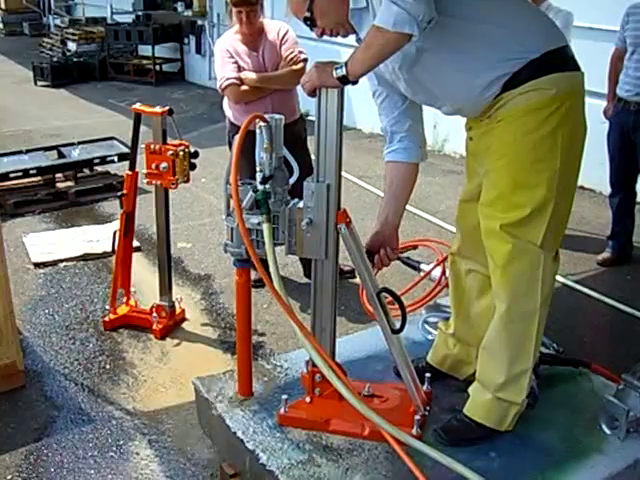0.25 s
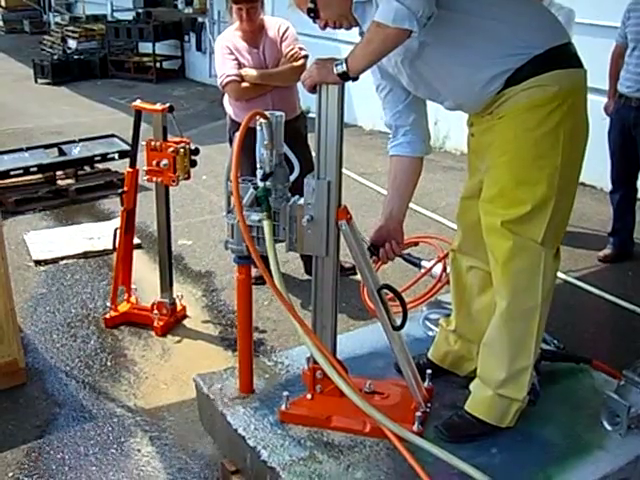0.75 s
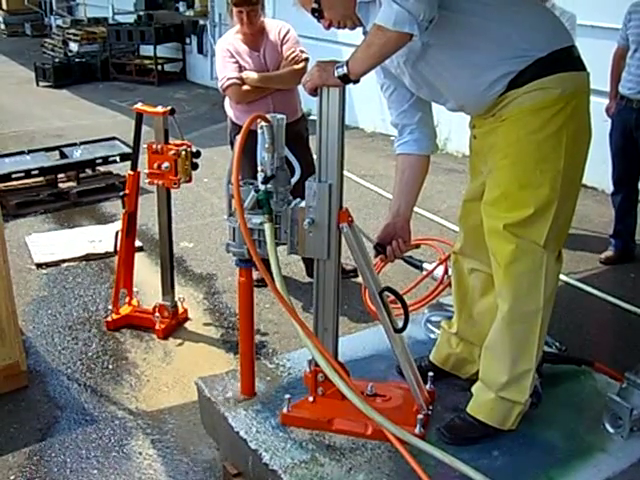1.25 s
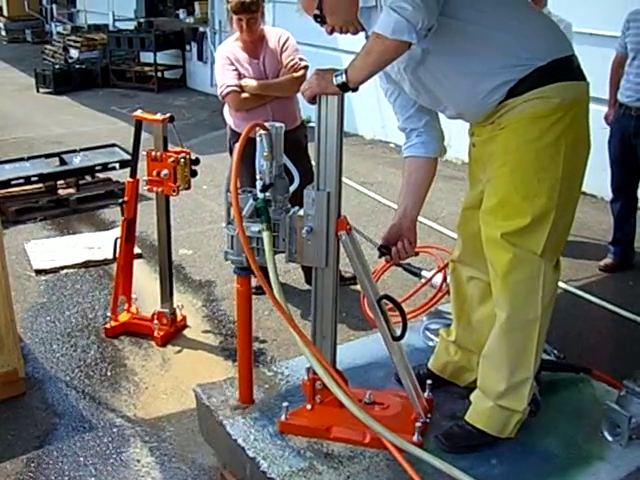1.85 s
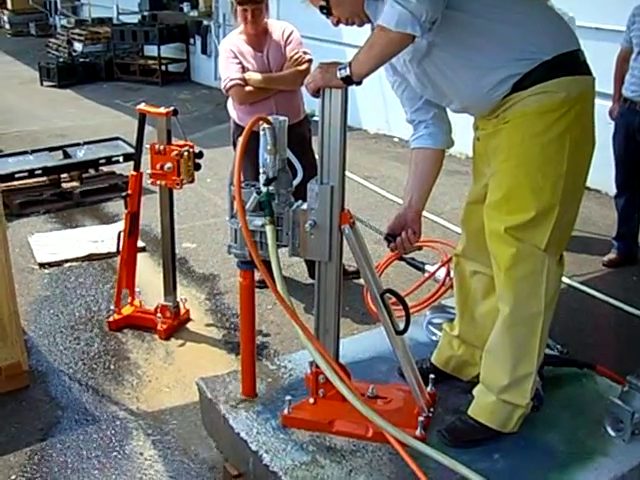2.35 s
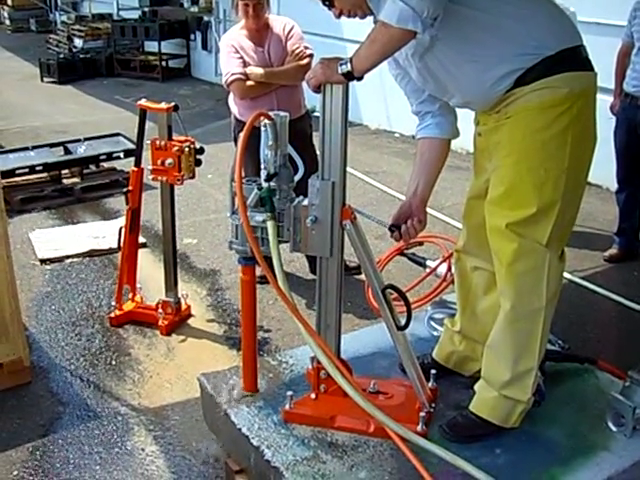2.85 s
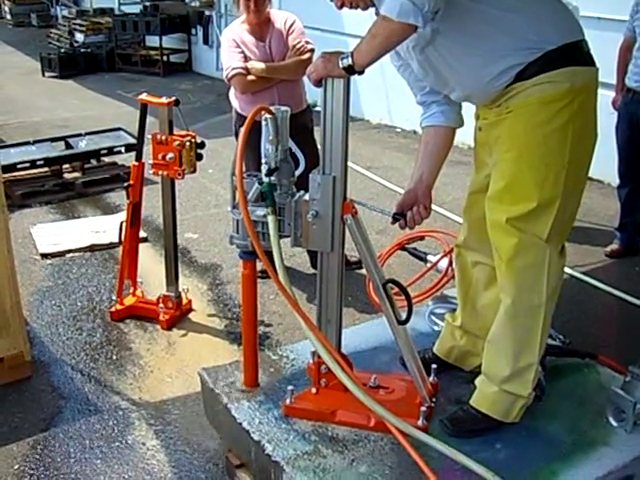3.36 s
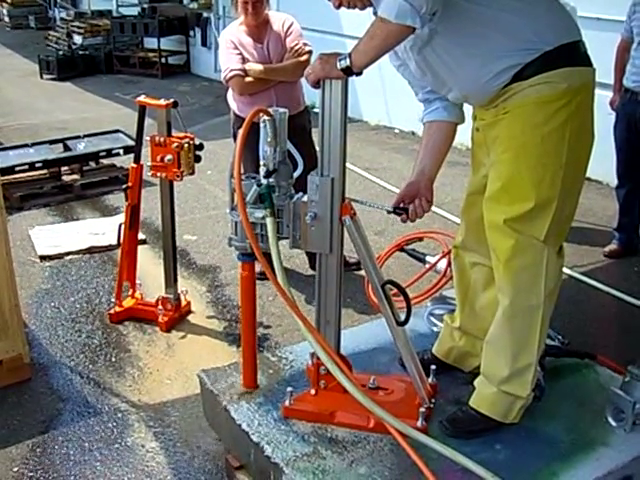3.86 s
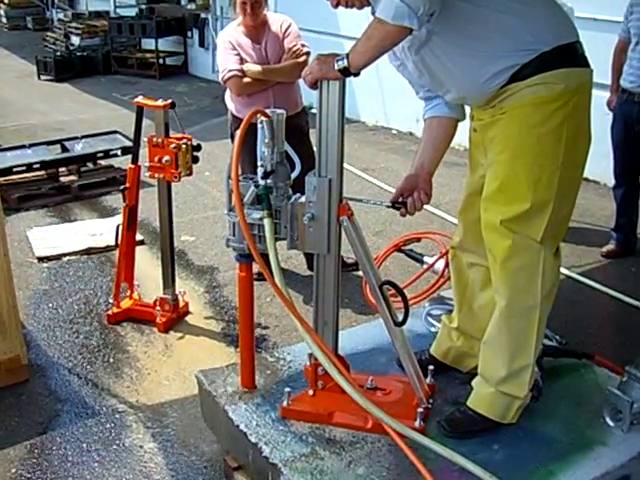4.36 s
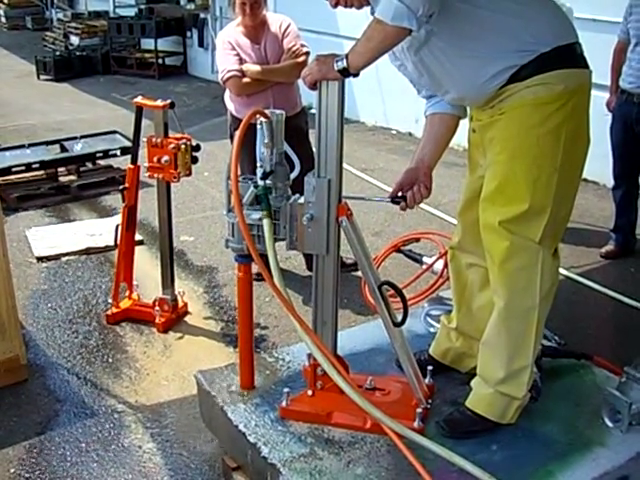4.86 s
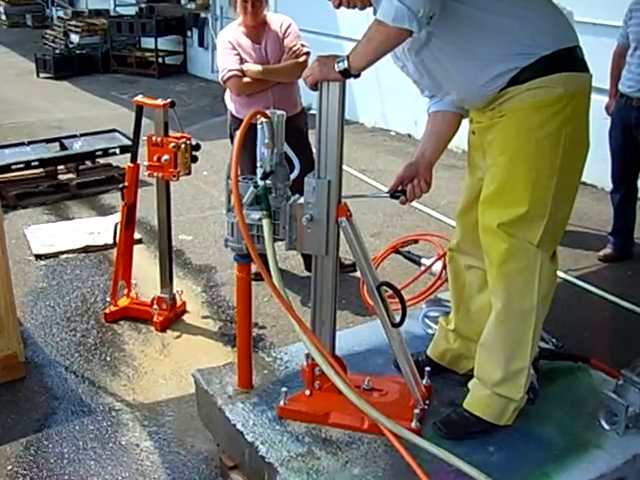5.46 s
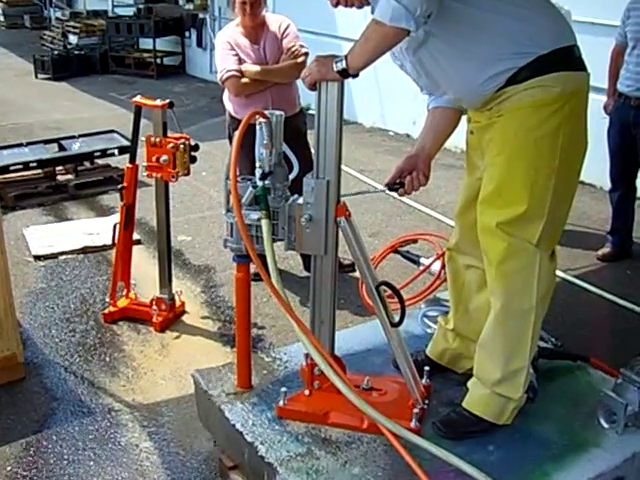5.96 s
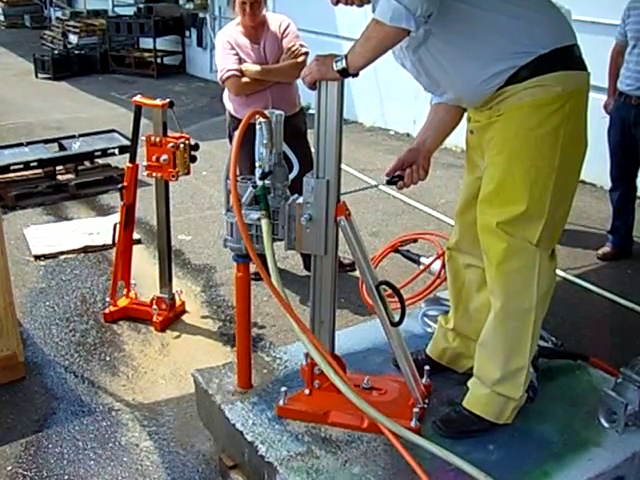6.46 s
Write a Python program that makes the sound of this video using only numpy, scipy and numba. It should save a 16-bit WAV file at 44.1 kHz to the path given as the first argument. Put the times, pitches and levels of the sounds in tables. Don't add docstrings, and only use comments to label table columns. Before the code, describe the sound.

Continuous shrill gear whine of an electric drill boring concrete, with throbbing barrel hum, gritty scraping and hissing water spray, in open air.

```python
import sys
import numpy as np
from scipy import signal
from scipy.fft import rfft, irfft
from scipy.io import wavfile
from scipy.ndimage import uniform_filter1d
from numba import njit

SR = 44100
rng = np.random.default_rng(int(sys.argv[2]) if len(sys.argv) > 2 else 0)


def file_out(sig):
    cols = np.atleast_2d(sig).T
    lim = np.clip(cols, -1, 1)
    pcm = np.round(lim * 32767).astype(np.int16)
    wavfile.write(sys.argv[1], SR, pcm)


def gain_from_decibels(decibels):
    exponent = np.asarray(decibels, float) / 20
    return 10 ** exponent


N = 295470
BLOCK = 64
TIME = np.arange(N // BLOCK + 2) * BLOCK / SR

PINION_TEETH, WHEEL_TEETH = 9, 38
SPINDLE_RATIO = 28.467
BEARING_RATIO = 1.28355

# time in seconds, pinion mesh in Hz, whine level in dB.
MOTOR_SPEED = [(0, 4446, -18.5), (.33, 4444, -18.1), (.62, 4451, -19.8), (.95, 4449.8, -20.7),
               (1.8, 4443, -18.7), (2.0, 4445.2, -18.7), (2.38, 4444, -18.7), (2.56, 4448.8, -19.5),
               (3.15, 4443.4, -18.6), (3.4, 4444.4, -20.6), (3.85, 4444, -21.3), (4.35, 4447.3, -22.8),
               (4.85, 4447.6, -23.6), (5.1, 4451, -26.3), (5.42, 4451, -27.2), (5.68, 4446.4, -23.9),
               (6.25, 4446.3, -22.2), (6.7, 4447.3, -24.5)]


def motor_turns():
    mesh_hz = curves(MOTOR_SPEED)[0]
    mesh_cycles = (np.cumsum(mesh_hz) - MOTOR_SPEED[0][1]) * BLOCK / SR
    return mesh_cycles / PINION_TEETH


# level in dB, dB gained per dB of whine.
WHINE_COMPANIONS = [
    (-33.5, 0),
    (-37.1, 2),
    (-42, -.9),
]


def whine(motor):
    whine_db = curves(MOTOR_SPEED)[1]
    strain_db = whine_db - whine_db.mean()
    tenth_db, slip_db, octave_db = (db + follow * strain_db for db, follow in WHINE_COMPANIONS)
    flutter_hz = 4 * walk(5)
    slip = 9.905 * motor + np.cumsum(flutter_hz) * BLOCK / SR
    pinion = tone(PINION_TEETH * motor, whine_db + 0.2 + 0.47 * walk(18))
    sides = [(PINION_TEETH + 1, tenth_db), (2 * PINION_TEETH, octave_db)]
    return pinion + tones(motor, sides, wobble_db=2.5, rate=14) + tone(slip, slip_db)


# multiple of motor turn, level in dB.
MOTOR_ORDERS = [(10, -34.1), (12, -43.0), (13, -47.4), (15, -46.0), (17, -44.7), (18, -38.8), (19, -43.7),
                (21, -45.8), (23, -52.6), (24, -53.6), (27, -55.2), (28, -63.2), (29, -63.5), (30, -55.1)]
# multiple of countershaft turn, level in dB.
COUNTERSHAFT_ORDERS = [(19, -45.6), (20, -47.4), (24, -42.7), (37, -43.5), (39, -39.1), (40, -44.0),
                       (41, -40.2), (48, -42.2), (57, -43.0), (58, -48.8), (69, -53.9), (70, -51.0),
                       (84, -46.8), (90, -48.5), (95, -49.4), (96, -53.1), (99, -50.1), (105, -56.7),
                       (125, -63.6), (126, -65.5)]


def shafts(motor):
    in_whine = (PINION_TEETH + 1, 2 * PINION_TEETH)
    motor_orders = [row for row in MOTOR_ORDERS if row[0] not in in_whine]
    countershaft = motor * PINION_TEETH / WHEEL_TEETH
    hum = tones(motor, motor_orders, wobble_db=2.5)
    return hum + tones(countershaft, COUNTERSHAFT_ORDERS, wobble_db=3.0, rate=7)


# multiple of ball pass, spindle sideband, level in dB.
BALL_PASSES = [(1, 0, -37), (1, 1, -44), (1, 2, -44), (1, 3, -46), (2, 0, -34), (3, 0, -47), (4, 0, -48),
               (5, 0, -50)]


def bearing(motor):
    balls = [(k * BEARING_RATIO + side / SPINDLE_RATIO, db) for k, side, db in BALL_PASSES]
    return tones(motor, balls, wobble_db=1.5)


# multiple of motor turn, level in dB.
HOUSING_BEATS = [(1.735, -54), (2.311, -45), (2.372, -43), (2.6187, -45), (2.721, -49), (2.7504, -43),
                 (5.501, -48), (5.5926, -45), (5.775, -45), (8.435, -46), (8.618, -40.5), (8.909, -45),
                 (8.965, -45), (10.09, -48), (22.04, -47)]
# multiple of spindle turn, level in dB.
SPINDLE_MESH = [(31, -41.5), (61, -43), (62, -31), (93, -39.5), (124, -47), (186, -45), (217, -47)]


def gearbox(motor, spindle):
    beats = tones(motor, HOUSING_BEATS, wobble_db=2.5, rate=9)
    mesh = tones(spindle, SPINDLE_MESH, wobble_db=0.24)
    return gain_from_decibels(-0.5) * shafts(motor) + gain_from_decibels(0.2) * (bearing(motor) + beats + mesh)


# multiple of spindle turn, level in dB.
LOW_RING = [(37, -49), (38, -34), (39, -35.5), (40, -48)]
# multiple of spindle turn, level in dB.
HIGH_RING = [(76, -37), (77, -33), (78, -48), (79, -48)]
RING_PARTNER = [(75, -35.5)], -.0218


def barrel(spindle):
    low_table = [(k, db - 2.5 + swell(39 if k > 38 else 38)) for k, db in LOW_RING]
    low = ring(spindle, low_table, turn=0.33, wobble_db=1.9)
    high = ring(spindle, HIGH_RING, turn=-0.02, wobble_db=1.8)
    high += ring(spindle, *RING_PARTNER, wobble_db=0.0)
    return low + fine(gain_from_decibels(-0.4 + 0.8 * pressure())) * high


STAND_ORDERS = (9, 10, 11), (15, 17, 20, 22)
# multiple of spindle turn, level in dB.
STAND_SHAKE = [(16, -50), (18, -50), (19, -50), (25, -53), (32, -51), (45, -54), (53, -50), (55, -50),
               (60, -48)]


def stand(spindle):
    sway_orders, stand_orders = STAND_ORDERS
    strong = [(k, -56 + swell(10)) for k in sway_orders]
    strong += [(k, -55.5 + swell(k)) for k in stand_orders]
    weak = gain_from_decibels(-2.0) * tones(spindle, STAND_SHAKE, wobble_db=-1.0, rate=2.4)
    return weak + tones(spindle, strong, wobble_db=3.0, rate=7)


# centre in seconds, multiple of spindle turn, length in seconds, swell in dB.
SHUDDERS = [(0.84, 10, 1.1, 5.5), (2.3, 10, 0.66, 2), (4.1, 10, .4, 5), (5.32, 10, .7, 11),
            (0.54, 15, .9, 9), (1.48, 15, .4, 10), (3.46, 15, 1.0, 5), (6.1, 15, 1.3, 12), (1.0, 17, 1, 14),
            (2.65, 17, .6, 5), (4.8, 17, 0.7, 14.5), (0.72, 20, .5, 10), (1.74, 20, .5, 14),
            (2.32, 20, 0.64, 18.5), (6.6, 20, .6, 8), (0.65, 22, 2.6, 9.5), (2.83, 22, 0.73, 10.5),
            (4.03, 22, 1.4, 10.5), (6.6, 22, .5, 8), (1.2, 38, 0.44, 4), (2.3, 38, 0.59, 5.5),
            (3, 38, 0.45, 6.5), (4.46, 38, 0.85, 5.5), (6.1, 38, 2.1, 4), (2, 39, 1.0, 2.5),
            (3.3, 39, .9, 2.5), (4.8, 39, .9, 3), (5.2, 39, 0.35, 6)]


def swell(order):
    return sum(db * np.exp(-(2 * (TIME - s) / length) ** 2)
               for s, k, length, db in SHUDDERS if round(k) == order)


# time in seconds, upper tone in dB, lower tone in dB.
GROAN = [
    (0, -42, -40),
    (.1, -40, -46),
    (.22, -33, -46),
    (.3, -53, -55),
    (.45, -73, -70),
]
GROAN_ORDERS = 41, 32.7


def groan(spindle):
    return tones(spindle, zip(GROAN_ORDERS, curves(GROAN)), wobble_db=0.5, rate=20)


def cutting(spindle):
    again = repeating(spindle)
    surge = 0.62 * walk(6.4) + 0.83 * walk(20) + 0.8 * walk(70)
    beats = turn_beats(spindle)
    crown = rumble(again) + grind(again, surge, beats)
    return crown + fan(surge, beats) + spray(surge, beats) + breeze()


def repeating(spindle, count=10, size=2540):
    patterns = rng.standard_normal((count, size))
    wear = np.arange(N) / N * (count - 1)
    row = wear.astype(int)
    share = wear % 1 * np.pi / 2
    place = (fine(spindle) % 1 * size).astype(int)
    return np.cos(share) * patterns[row, place] + np.sin(share) * patterns[row + 1, place]


TURN_BEAT = [
    (1, .25),
    (2, -.24),
    (4, -.29),
]


def turn_beats(spindle):
    return [np.cos(2 * np.pi * (k * spindle + lead)) for k, lead in TURN_BEAT]


# frequency in Hz, level in dB per Hz.
RUMBLE = [(60, -75.5), (130, -72), (180, -65.5), (240, -70.5), (310, -63.5), (430, -67.5), (560, -67.5),
          (720, -66), (860, -74.5), (930, -61), (1400, -72), (2200, -75), (4000, -110)]


def rumble(again):
    return colour(rng.standard_normal(N) + gain_from_decibels(-2.0) * again, RUMBLE)


# frequency in Hz, level in dB per Hz.
GRIND = [(500, -110), (800, -78), (1000, -72), (1420, -65.5), (1900, -62.5), (2500, -62), (3150, -60.5),
         (3600, -57.5), (4300, -60.5), (4800, -59), (5600, -72), (7000, -110)]


def grind(again, surge, beats):
    _, twice, segments = beats
    level_db = 0.85 * pressure() + 0.5 * surge + 0.25 * twice + 0.95 * segments
    return colour(rng.standard_normal(N) + gain_from_decibels(-5) * again, GRIND) * fine(gain_from_decibels(level_db))


# frequency in Hz, level in dB per Hz.
FAN = [(3000, -110), (4000, -77), (5000, -62), (5500, -62), (6300, -59.5), (7200, -63), (7800, -63),
       (9000, -86), (11000, -110)]


def fan(surge, beats):
    _, twice, segments = beats
    level_db = 0.76 * pressure() + 0.53 * surge + 0.7 * twice + 0.58 * segments + 0.34 * walk(30.1)
    return colour(rng.standard_normal(N), FAN) * fine(gain_from_decibels(level_db))


# frequency in Hz, level in dB per Hz.
SPRAY = [(5500, -110), (7000, -80), (8200, -60.5), (9500, -58.5), (10700, -61), (11500, -68),
         (12500, -73.5), (13300, -74.5), (14000, -77), (15500, -78.5), (17500, -82)]


def spray(surge, beats):
    once, twice, _ = beats
    level_db = 1.2 * pressure() + 0.44 * surge + 0.36 * once + 0.4 * twice + 0.72 * walk(120)
    return colour(rng.standard_normal(N), SPRAY) * fine(gain_from_decibels(level_db))


# frequency in Hz, level in dB per Hz.
BREEZE = [(8, -88), (16, -67), (30, -60), (60, -66), (130, -72), (400, -100)]


def breeze():
    gust_db = 1.0 * walk(2.88)
    return colour(rng.standard_normal(N), BREEZE) * fine(gain_from_decibels(1.3 * pressure() + gust_db))


# time in seconds, pressure in dB.
FEED = [(0, -23), (.5, -23), (.8, -21.5), (.95, -22.5), (1.3, -21.5), (1.55, -22), (1.75, -23),
        (2.5, -21.5), (2.75, -23), (3.6, -22), (4.4, -20.5), (5.3, -20.5), (5.47, -21.5), (5.9, -20.5),
        (6.4, -20.5), (6.55, -22), (6.7, -20)]


def pressure():
    feed_db = curves(FEED)[0]
    return feed_db - feed_db.mean()


# frequency in Hz, width in Hz, boost in dB.
BODY = [(640, 87, 9), (1294, 75, 6.5), (1556, 190, 3.5), (1920, 66, -5), (2190, 160, 1.5), (2870, 310, 3),
        (3960, 81, 5.5), (4150, 60, 0), (4450, 65, 4), (5020, 60, -1), (5220, 66, 7), (5820, 290, 6.5),
        (6100, 80, 1.5), (6710, 87, 4), (7500, 200, 4.5), (8630, 100, 2), (10700, 370, 2)]


def colour(x, points):
    hz = np.maximum(np.fft.rfftfreq(N, 1 / SR), 1)
    point_hz, point_db = np.transpose(points)
    db = np.interp(np.log(hz), np.log(point_hz), point_db)
    db += sum(boost / (1 + (2 * (hz - f) / width) ** 2) for f, width, boost in BODY)
    return irfft(rfft(x) * gain_from_decibels(db) * np.sqrt(SR / 2), N)


def tones(turns, table, wobble_db, rate=3):
    return sum(tone(k * turns + rng.random(), db + wobble_db * walk(rate)) for k, db in table)


def ring(spindle, table, turn, wobble_db):
    return sum(tone(k * (spindle - turn), db + wobble_db * walk(4.94)) for k, db in table)


def tone(turns, db):
    return spin(2 * np.pi * turns, np.sqrt(2) * gain_from_decibels(db), BLOCK)[:N]


@njit
def spin(angle, gain, hop):
    out = np.empty((len(angle) - 1) * hop)
    for j in range(len(angle) - 1):
        z = np.exp(1j * angle[j])
        step = np.exp(1j * (angle[j + 1] - angle[j]) / hop)
        for i in range(hop):
            out[j * hop + i] = (gain[j] + (gain[j + 1] - gain[j]) * i / hop) * z.real
            z *= step
    return out


def curves(table):
    s, *columns = np.transpose(table)
    return [np.interp(TIME, s, c) for c in columns]


def walk(rate):
    knots = np.repeat(rng.standard_normal(int(rate * N / SR) + 2), 8)
    smooth = 1.36 * uniform_filter1d(uniform_filter1d(knots, size=8), size=8)
    return np.interp(TIME * rate * 8, np.arange(len(smooth)), smooth)


def fine(control):
    return np.interp(np.arange(N) / SR, TIME, control)


def scene():
    motor = motor_turns()
    spindle = motor / SPINDLE_RATIO
    machine = whine(motor) + gearbox(motor, spindle)
    rig = barrel(spindle) + stand(spindle) + groan(spindle)
    return (machine + rig + cutting(spindle))[None]


def roll_off(x):
    return signal.sosfilt(signal.butter(12, 17210, fs=SR, output="sos"), x)


def record(dry):
    notch_hz, width_hz = 7950, 470
    b, a = signal.iirnotch(notch_hz, notch_hz / width_hz, fs=SR)
    notched = 0.92 * signal.lfilter(b, a, dry) + 0.08 * dry
    mix = np.tanh(0.8 * notched) / 0.8
    return roll_off(mix)


dry = scene()
out = record(dry)
file_out(out)
```